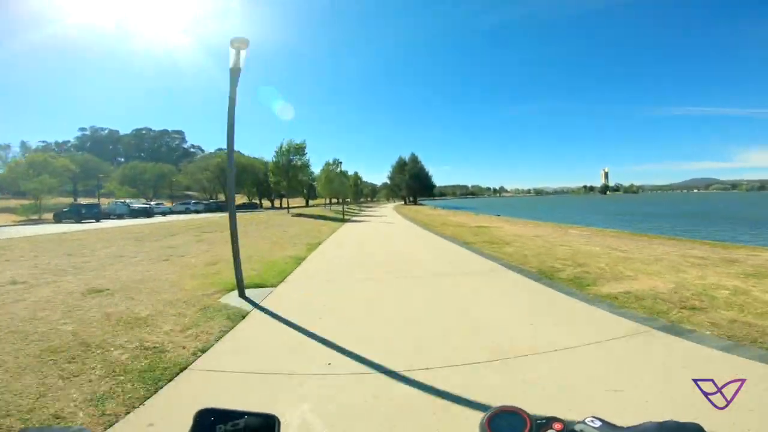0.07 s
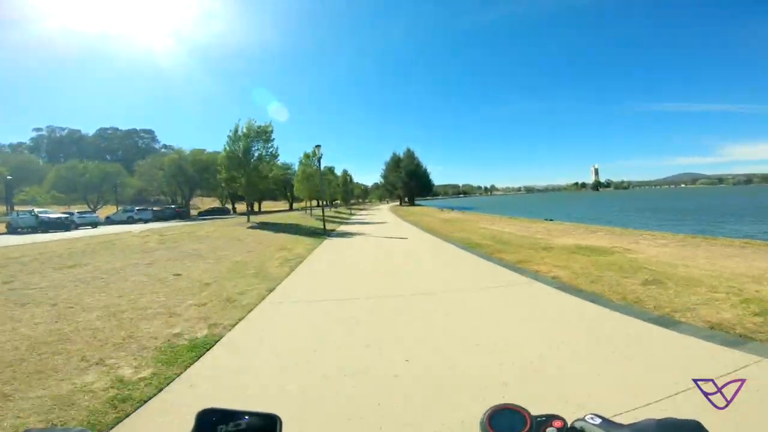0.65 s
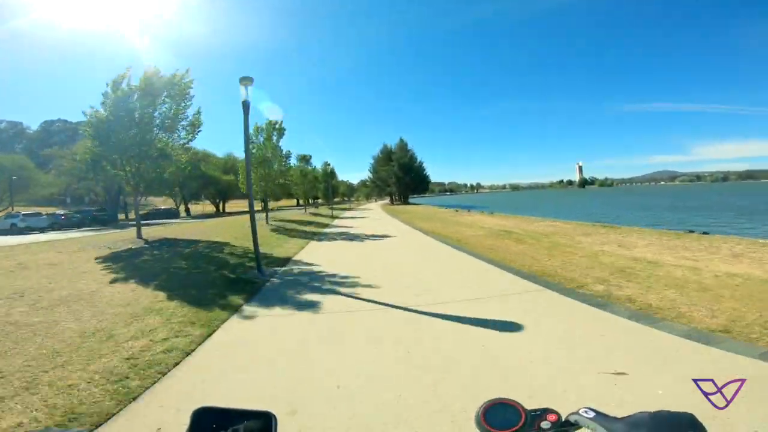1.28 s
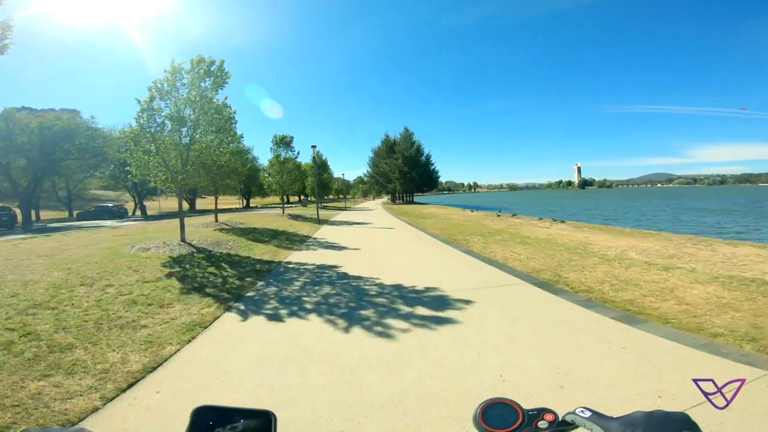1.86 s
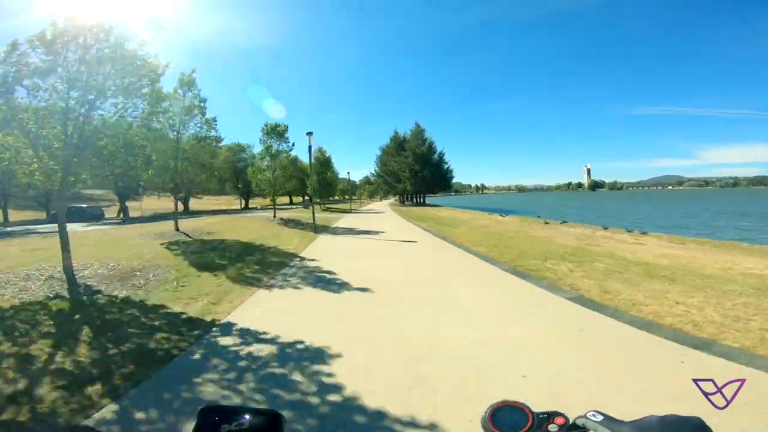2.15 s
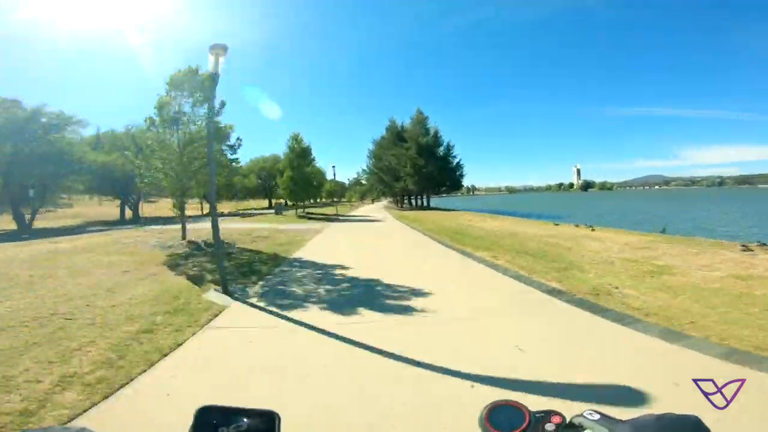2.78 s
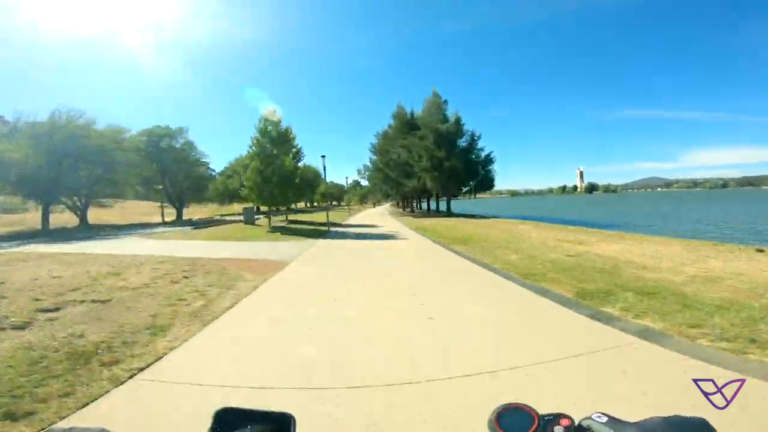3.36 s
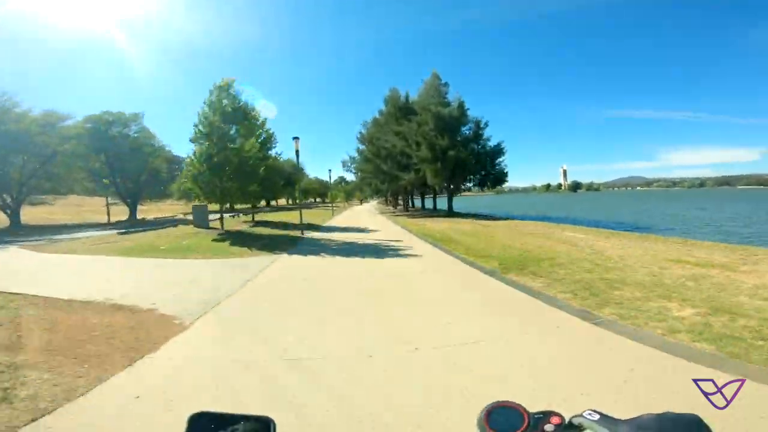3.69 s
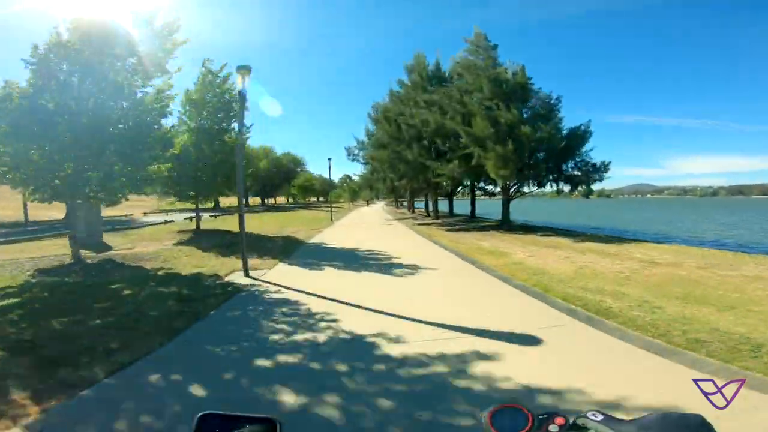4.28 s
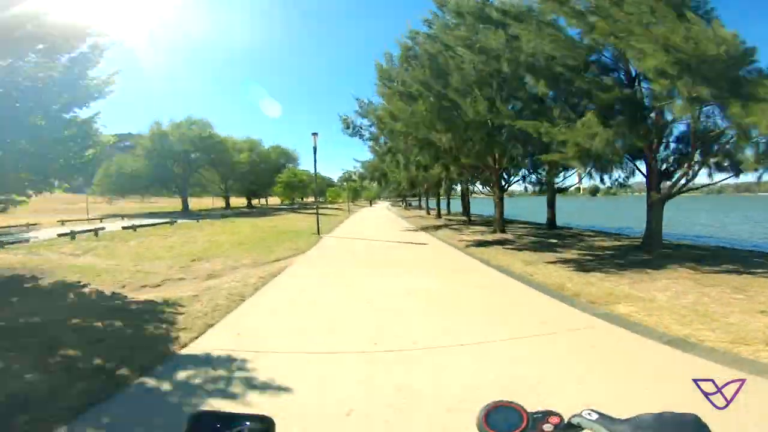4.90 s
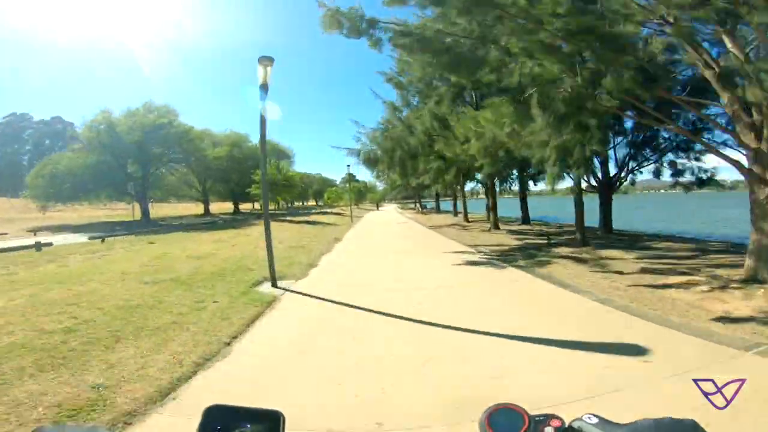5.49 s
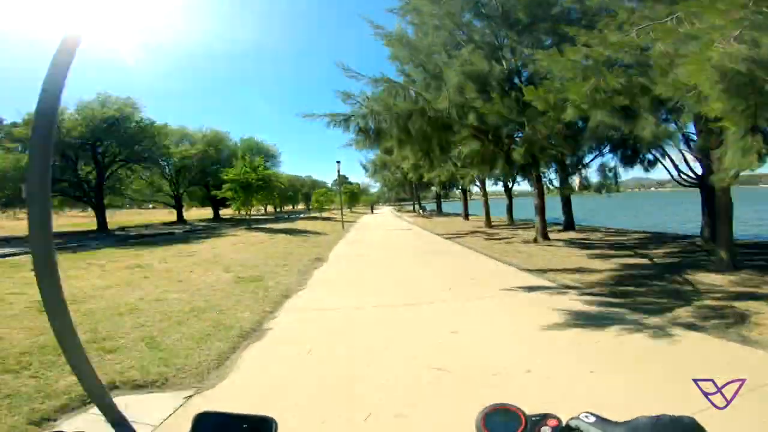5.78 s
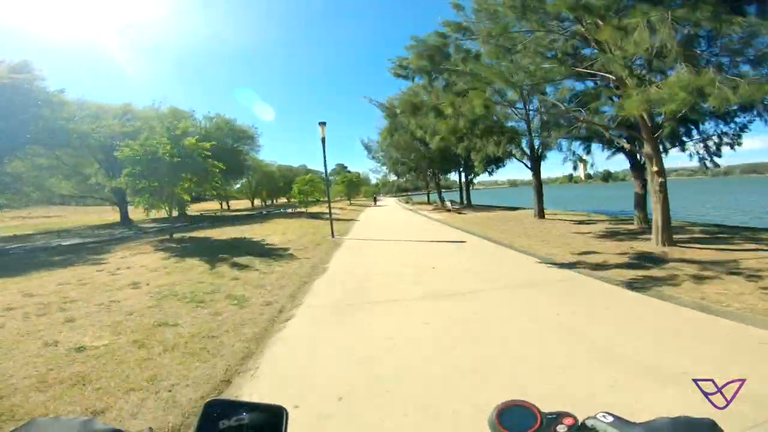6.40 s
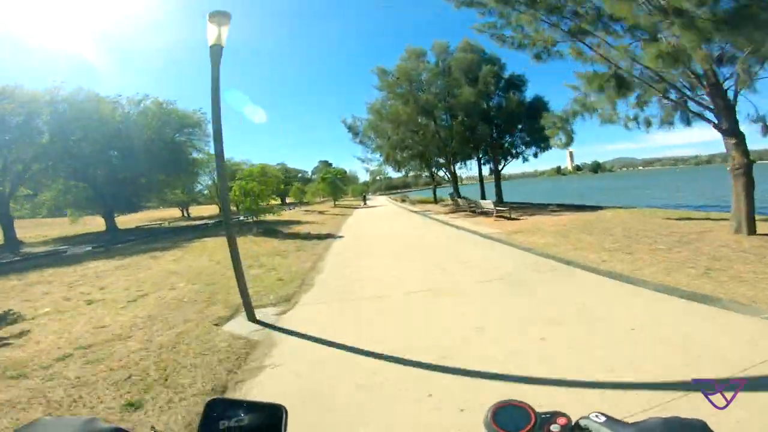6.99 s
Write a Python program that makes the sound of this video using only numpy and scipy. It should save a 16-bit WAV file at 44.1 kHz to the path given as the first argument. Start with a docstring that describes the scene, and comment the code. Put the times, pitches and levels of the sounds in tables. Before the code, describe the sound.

Wind gusts on the microphone over the throbbing whine of an electric scooter, its tyres roaring and thumping along concrete.

```python
"""An electric scooter cruises along a concrete lakeside path, heard from a small camera riding on it.
From the start two close motor notes throb, the tyres roar and hiss, and wind buffets both microphones.
Within half a second grit flies, faint crackles come and the wheels thump over joints between slabs.
Near 3 s a brief tone first swells just above the motor. After 5 s the wind drops, the bumps come thick
and fast and loose deck fittings knock. The wind picks up again for the last second and pops twice."""
import sys
import numpy as np
from scipy import signal
from scipy.fft import rfft, irfft, next_fast_len
from scipy.io import wavfile

SR = 44100
rng = np.random.default_rng(int(sys.argv[2]) if len(sys.argv) > 2 else 0)


def unload_wav(signal):
    """Save mono or channel-first audio to the path in sys.argv[1] as 16-bit WAV at rate SR, clipped to [-1, 1]."""
    wavfile.write(
        sys.argv[1],
        SR,
        np.round(np.clip(np.atleast_2d(signal).T, -1, 1) * 32767).astype(np.int16),
    )


N = 310905
TIME = np.arange(N) / SR
FREQ = np.fft.rfftfreq(N, 1 / SR) + 1e-3
LEAD_S = .004  # silence before each strike

# Levels in the tables are starting points: the functions add their own gains.
# midpoint of the two motor notes as the speed drifts: time_s, pitch_hz
MOTOR_PITCH = [(0, 410.5), (.7, 412), (1.3, 413.5), (2.6, 414), (3.9, 416), (4.4, 414.5), (5.05, 412.5),
               (5.7, 414.5), (7.05, 414)]
# gap between the two motor notes: time_s, beat_hz
MOTOR_BEAT = [(0, 4.24), (.55, 4.25), (1, 5.31), (2.7, 5.19), (3.6, 4.42), (4.5, 3.25), (5.65, 4.64),
              (6.15, 3.98), (6.55, 3.1), (7.05, 5.26)]
# strength of the motor's whine: time_s, level_db
MOTOR_LEVEL = [(0, -47.5), (.35, -54), (.74, -48.5), (1.05, -52.5), (1.48, -45.5), (1.7, -51.5),
               (2.1, -46.5), (2.45, -48.5), (2.7, -49.5), (3.05, -50.5), (3.7, -47), (4.2, -46),
               (4.7, -48.5), (5, -46), (5.5, -45.5), (5.75, -49), (6, -44.5), (7.05, -52)]

# tyres on the changing surface: time_s, roar_db, hiss_db
TYRE_LEVELS = [(0, -58, -81.5), (.33, -61, -81.5), (.38, -62, -90.5), (1.02, -61, -88.5),
               (1.12, -59, -84.5), (1.5, -60, -82.5), (1.6, -61.5, -89), (3, -61, -89.5),
               (4.6, -58.5, -81.5), (5.75, -57, -77.5), (6.4, -58, -79.5), (7.05, -60, -82)]
# tone of the tyre roar: frequency_hz, gain_db
ROAR_COLOUR = [(30, -13.5), (100, 1), (300, 4.5), (400, 8), (490, 13.5), (570, 5.5), (660, 0), (950, -1.5),
               (1300, 3), (1750, -3.5), (2500, -1.5), (3000, -10), (3600, -19.5), (4500, -33.5),
               (7000, -59.5)]
# tone of the tyre hiss: frequency_hz, gain_db
HISS_COLOUR = [(2500, -5.5), (3800, -2), (5000, 1.5), (5700, -1.5), (6250, -1), (6650, 1), (7050, -4),
               (7900, -9), (8800, -18), (10500, -30.5), (15000, -38.5)]
# where the wheels and deck ring: frequency_hz, width_hz, lift_db
DECK_RESONANCES = [(310, 38, 6.5), (434, 32, 5.5), (800, 110, 10), (1451, 54, 7.5), (1870, 350, 7)]
# road sound at the left microphone compared with the right: frequency_hz, gain_db
LEFT_SHADE = [(100, 3), (420, -1.5), (560, -5.5), (790, -21), (1050, -5.5), (1450, -13.5), (1750, -9),
              (1980, -9.5), (2200, -2), (3300, -9), (5200, -2.5), (7000, -8)]

# steady head wind: time_s, left_db, right_db
HEAD_WIND = [(0, -49, -42), (.7, -41, -42), (1.05, -41, -41.5), (2.2, -35, -39), (2.85, -39, -44.5),
             (3.12, -46, -41.5), (3.7, -41.5, -41.5), (4.05, -46.5, -42.5), (4.5, -39, -45),
             (4.65, -51.5, -42.5), (5.05, -43, -43.5), (5.15, -55, -52.5), (5.8, -60, -54),
             (6.15, -51.5, -46), (7.05, -42, -44.5)]
# gusts on top of it: start_s, length_s, left_db, right_db
WIND_GUSTS = [(0.126, 0.045, -34.5, -36), (0.213, 0.38, -37, -45.5), (0.219, 0.021, -40, -40),
              (0.801, 0.065, -36.5, -47.5), (1.264, 0.33, -38.5, -47.5), (1.589, .36, -37, -45),
              (1.72, 0.21, -39.5, -43.5), (2.094, 0.049, -38, -37), (2.462, .36, -38.5, -37.5),
              (2.902, 0.024, -37.5, -39.5), (3.196, 0.36, -36.5, -44.5), (3.654, 0.069, -38, -46),
              (3.854, 0.066, -41, -41.5), (4.264, 0.1, -36.5, -40.5), (4.86, 0.059, -47, -51.5),
              (5.608, 0.043, -45.5, -40.5), (6.238, 0.033, -36.5, -45), (6.389, 0.088, -38, -43),
              (6.692, 0.41, -39.5, -46.5)]
# tone of slow swirls of air: frequency_hz, gain_db
BUFFET_COLOUR = [(20, -34), (40, -29.5), (60, -16), (110, -2.5), (240, 1.5), (400, -1.5), (600, -11.5),
                 (1000, -23), (2000, -45.5), (5000, -81.5)]
# tone of the fast swirls in strong gusts: frequency_hz, gain_db
RUSH_COLOUR = [(100, -21.5), (300, -0.5), (500, 9), (800, -0.5), (1100, -6), (1500, -16.5), (2400, -29),
               (4000, -53), (9000, -74)]
# the rush grows steeply in strong wind: buffet_db, rush_db
RUSH_BY_WIND = [(-48.5, -72), (-42.5, -65), (-38, -49), (-31, -33)]

# the loudest stone chips: start_s, level_db, centre_hz
GRIT_HITS = [(0.2, -68, 5500), (1.399, -75, 5500), (1.615, -76, 5500), (1.688, -75, 5500),
             (2.118, -77, 5300), (2.154, -71, 5500), (2.908, -82, 5500), (3.134, -73, 5400),
             (3.171, -77, 6000), (4.685, -70, 5500), (4.764, -69, 6000), (5.742, -64, 5600),
             (5.782, -63, 6000), (5.812, -64, 6700), (6.163, -76, 7200), (6.304, -67, 6900),
             (6.463, -73, 7300)]
# brief faint crackles of rapid clicks: middle_s, half_length_s, level_db, centre_hz
TREBLE_CRACKLES = [(0.312, 0.055, -90, 10500), (.73, .03, -99, 9000), (1.11, 0.045, -102, 9000),
                   (1.24, .04, -100, 8500), (1.463, 0.025, -86, 9500), (2.42, .015, -99, 9500),
                   (2.67, 0.016, -99, 9000), (2.825, .015, -101, 9000), (3.137, .03, -83, 5200),
                   (3.19, .04, -98, 8600), (4.383, .015, -97, 10000), (4.92, .03, -98, 9000),
                   (5.716, 0.05, -72, 2980), (5.76, 0.043, -77, 5600), (5.899, 0.051, -83, 6500),
                   (6.285, 0.039, -57.5, 2350), (6.302, .03, -82, 7000), (6.439, 0.012, -87, 10100),
                   (6.487, 0.041, -92, 9000), (6.88, 0.015, -91, 10300)]
# tiny sharp ticks: start_s, level_db
SHARP_TICKS = [(.278, -70), (.294, -67), (.321, -73), (.337, -67), (.369, -72), (1.456, -73), (1.509, -63),
               (1.515, -69), (2.665, -82), (6.437, -71), (6.443, -72), (6.879, -77)]
# thumps and clacks from the path, plus wind pops at 6.453 and 6.724 s: start_s, thump_db, clack_db
THUMPS_AND_CLACKS = [(.305, -32, -27), (0.338, -25.5, -27), (0.46, -35, -33), (1.402, -29, -31),
                     (2.274, -38.5, -24), (2.327, -35, -24.5), (2.83, -27.5, -34), (4.267, -35, -27),
                     (4.786, -33.5, -21), (5.236, -30, -36), (5.261, -26.5, -32), (5.439, -33.5, -27.5),
                     (5.836, -31.5, -23), (6.032, -29.5, -32), (6.453, -42, -42), (6.463, -29.5, -18.5),
                     (6.647, -28.5, -23), (6.724, -32.5, -31), (6.832, -32.5, -20)]
# ringing of the stem and camera mount (fade is the time to fall 60 dB): pitch_hz, level_db, fade_s
MOUNT_RINGS = [(433, -12, 0.027), (590, -3, 0.03), (754, -7, 0.03), (950, -10, 0.017), (1280, -6, 0.0086),
               (1497, -8.5, 0.016)]
# brief wavering tones just above the motor whine: middle_s, half_length_s, level_db, pitch_hz
TONE_SWELLS = [(3.07, 0.1, -54, 443), (4.62, .07, -54, 441), (5.28, 0.088, -58, 439),
               (5.5, 0.078, -50, 452.6), (5.684, 0.065, -48.5, 468.6), (5.93, .07, -56, 438),
               (6.274, 0.092, -53.5, 471), (6.63, .07, -49, 470)]
# knocks of loose deck fittings: start_s, level_db
DECK_KNOCKS = [(5.216, -49), (5.639, -45.5), (5.686, -45), (5.717, -50), (5.846, -47), (6.607, -52)]


def undb(db):
    """Turn decibels into a number to multiply by."""
    return 10 ** (np.asarray(db) / 20)


def unit(x):
    """Scale a signal to an average strength (rms) of 1."""
    return x / np.sqrt(np.mean(x ** 2))


def curves(table):
    """Join the points of each column with straight lines in time."""
    times, *columns = np.transpose(table)
    return [np.interp(TIME, times, column) for column in columns]


def colour(points):
    """Turn a tone table into a gain for every frequency."""
    hz, db = np.transpose(points)
    return undb(np.interp(np.log(FREQ), np.log(hz), db))


def shape(x, gain):
    """Turn each frequency of a sound up or down by its gain."""
    size = next_fast_len(N, real=True)
    gain = np.interp(np.fft.rfftfreq(size, 1 / SR), FREQ, gain)
    return irfft(rfft(x, size) * gain, size)[..., :N]


def noise():
    """White noise: an even hiss."""
    return rng.standard_normal(N)


def wander(rate_hz):
    """A smooth random wobble of size 1; a higher rate wobbles faster."""
    return unit(shape(noise(), np.exp(-(FREQ / rate_hz) ** 2)))


def add(out, start_s, sound):
    """Mix a short sound in at the given time."""
    start = max(int(start_s * SR), 0)
    out[:, start:start + sound.shape[1]] += sound[:, :N - start]


def strike(decay_s):
    """The loudness outline of a blow: a sudden start, then a quick fade."""
    age = TIME[:4096] - LEAD_S
    return (age > 0) * np.exp(-np.abs(age) / decay_s)


def burst(outline, hz, width):
    """A band of noise around hz that follows a loudness outline, separate for each microphone."""
    freq = np.fft.rfftfreq(len(outline), 1 / SR) + 1
    band = np.exp(-.5 * (np.log(freq / hz) / width) ** 2)
    mics = irfft(rfft(rng.standard_normal((2, len(outline))) * outline) * band)
    return np.array([unit(mic) for mic in mics]) * np.sqrt(np.mean(outline ** 2))


def from_road(direct, scattered_left=0, scattered_right=0, lag_s=.000295):
    """Sound from below reaches the left microphone later and mostly weaker."""
    late_and_shaded = colour(LEFT_SHADE) * np.exp(-2j * np.pi * FREQ * lag_s)
    return np.array([shape(direct + scattered_left, late_and_shaded), direct + scattered_right])


def widen(mics):
    """The camera widens its stereo by taking some of each side away from the other."""
    leak = colour([(60, -27.5), (200, -19.0), (350, -15.5), (550, -7.5), (1000, -5.5), (2500, -18.0)])
    return mics - shape(mics[::-1], leak)


def motor(gain_db=-6, lower_db=-0.7, waver_hz=0.34, left_db=-1, right_db=2, lag_rad=0.24):
    """Two close magnetic notes slip in and out of step, so they throb; faint tones sit above them."""
    slip = -.56 + 2 * np.pi * np.cumsum(curves(MOTOR_BEAT)[0]) / SR
    phase = 2 * np.pi * np.cumsum(curves(MOTOR_PITCH)[0] + waver_hz * wander(9.5)) / SR
    notes = np.exp(1j * (phase + slip / 2)) + undb(lower_db) * np.exp(1j * (phase - slip / 2))
    left = undb(left_db) * (notes * np.exp(-1j * lag_rad)).real
    right = undb(right_db) * notes.real
    overtones = undb(-13) * np.cos(1.922 * phase) + undb(-17) * np.cos(2 * phase)
    just_above = undb(-11) * np.cos(1.055 * phase + 0.34 * wander(13))
    whine = np.array([left, right]) + from_road(overtones + just_above)
    return np.sqrt(2) * whine * undb(curves(MOTOR_LEVEL)[0] + gain_db)


def tyres(roar_db=8, hiss_db=1, hiss_scatter=2.3, bounce_db=1.16, grain_db=1.63):
    """Tread on rough concrete: a fluttering roar rings through wheels and deck, with fine hiss above."""
    roar_level, hiss_level = curves(TYRE_LEVELS)
    # the wheels bounce about 25 times a second
    bounce = unit(shape(noise(), np.exp(-((FREQ - 25) / 14) ** 2)))
    flutter = undb(bounce_db * bounce + grain_db * wander(450))
    ring_db = sum(db / (1 + (2 * (FREQ - hz) / width) ** 2) for hz, width, db in DECK_RESONANCES)
    # the low roar comes from the whole frame, so the microphones share less of it
    scatter = 0.34 + 0.93 / (1 + (FREQ / 1400) ** 6)
    body = colour(ROAR_COLOUR) * undb(ring_db) / np.sqrt(1 + scatter ** 2)
    roar = from_road(*(shape(noise(), body * g) for g in (1, scatter, scatter)))
    hiss = from_road(*(shape(noise(), colour(HISS_COLOUR) * g) for g in (1, hiss_scatter, hiss_scatter)))
    roar = flutter * unit(roar) * undb(roar_level + roar_db)
    hiss = np.sqrt(flutter) * unit(hiss) * undb(hiss_level + hiss_db)
    return roar + hiss


def wind_level(rise_s=0.024, fall_s=0.041):
    """Wind strength in dB at each microphone: head wind plus gusts that rise, hold and die away."""
    power = undb(curves(HEAD_WIND)) ** 2
    for start, length, left_db, right_db in WIND_GUSTS:
        rise = np.clip((TIME - start) / rise_s, 0, 1)
        fall = np.exp(-np.maximum(TIME - start - length, 0) / fall_s)
        power += (undb([[left_db], [right_db]]) * rise * fall) ** 2
    return 10 * np.log10(power)


def wind(buffet_db=-1, rush_db=-1, swirl_db=1.87, flicker_db=1.5, right_db=-1, deep_hz=150):
    """Slow swirls of air buffet each microphone; strong gusts add a brighter rush."""
    level = wind_level()
    swirls = undb(swirl_db * np.array([wander(75), wander(59)]))
    buffet = unit(shape(np.array([noise(), noise()]) * swirls, colour(BUFFET_COLOUR)))
    # faster air makes smaller swirls, so the deepest rumble grows less than the rest
    deep = shape(buffet, 1 / (1 + (FREQ / deep_hz) ** 6))
    deep_level = level.mean() + 0.48 * (level - level.mean())
    buffet = undb(buffet_db) * ((buffet - deep) * undb(level) + deep * undb(deep_level))
    # the rush pushes one microphone as it pulls the other; each also gets some noise of its own
    flow = noise() * np.array([[1], [-1]]) + 0.54 * np.array([noise(), noise()])
    flow = flow * swirls[0] * undb(flicker_db * wander(300))
    rush = unit(shape(flow, colour(RUSH_COLOUR))) * undb([[0], [right_db]])
    rush_level = np.interp(level[0], *np.transpose(RUSH_BY_WIND))
    return widen(buffet) + rush * undb(rush_level + rush_db)


def grit(decay_s=0.006, left_db=-5, fine_count=24, fine_db=-91.5, fine_hz=6500):
    """The tyres flick stone chips, each a soft tick; finer ones fly at random times."""
    out = np.zeros((2, N))
    fine_times = rng.uniform(0, TIME[-1], fine_count)
    fine = [(start, fine_db + 2 * rng.standard_normal(), fine_hz) for start in fine_times]
    for start, db, hz in GRIT_HITS + fine:
        add(out, start - LEAD_S, undb(db) * burst(strike(decay_s), hz, width=.16))
    return out * undb([[left_db], [0]])


def crackles(clicks_per_s=190, jitter=0.091, scatter_db=3, click_s=.0005, hiss=0.2, left_db=-2):
    """The treble crackles faintly for a moment: rapid, uneven clicks with a little hiss between."""
    out = np.zeros((2, N))
    click_count = np.cumsum(clicks_per_s * np.exp(jitter * wander(60))) / SR
    strength = undb(scatter_db * noise())[click_count.astype(int)]
    clicks = strength * np.exp(-(click_count % 1) / (clicks_per_s * click_s))
    crackle = unit(clicks + hiss)
    offset = TIME[:8192] - TIME[4096]
    for middle, half_length, db, hz in TREBLE_CRACKLES:
        outline = np.exp(-(offset / half_length) ** 2) * np.interp(middle + offset, TIME, crackle)
        add(out, middle + offset[0], undb(db) * burst(outline, hz, width=0.23))
    return out * undb([[left_db], [0]])


def ticks(decay_s=.00025, hz=9300, gain_db=1.5, left_db=-2):
    """Tiny sharp ticks stand out high above the rest."""
    out = np.zeros((2, N))
    for start, db in SHARP_TICKS:
        add(out, start - LEAD_S, undb(db + gain_db) * burst(strike(decay_s), hz, width=.36))
    return out * undb([[left_db], [0]])


def thumps_and_clacks(thump_s=0.0082, thump_hz=230, thump_gain_db=-1, clack_gain_db=-4, lag_s=0.000097):
    """Bumps in the path give a dull thump and a clack that rocks the mount; two wind pops sound alike."""
    thumps, clacks = np.zeros((2, N)), np.zeros((1, N))
    age = TIME[:4096]
    ring = sum((-1) ** k * undb(db - 60 * age / fade_s) * np.sin(2 * np.pi * hz * age)
               for k, (hz, db, fade_s) in enumerate(MOUNT_RINGS))
    for start, thump_db, clack_db in THUMPS_AND_CLACKS:
        thump = burst(strike(thump_s), thump_hz, width=0.75)
        add(thumps, start - LEAD_S, undb(thump_db + thump_gain_db) * thump)
        add(clacks, start, undb(clack_db + clack_gain_db) * ring[None])
    thumps *= undb([[-15], [0]])  # weaker on the left
    # soft rubber passes on no treble
    right = signal.sosfilt(signal.butter(4, 1900, fs=SR, output="sos"), clacks[0])
    # sideways rocking moves the two microphones opposite ways
    left = -undb(-3.5) * shape(right, np.exp(-2j * np.pi * FREQ * lag_s))
    return widen(thumps) + np.array([left, right])


def tone_swells(waver_hz=6):
    """Now and then a wavering tone swells and fades just above the motor whine."""
    waver = waver_hz * wander(31)
    tones = np.zeros(N)
    for middle, half_length, db, hz in TONE_SWELLS:
        swell = undb(db) * np.exp(-((TIME - middle) / half_length) ** 2)
        tones += swell * np.sin(2 * np.pi * np.cumsum(hz + waver) / SR)
    return from_road(np.sqrt(2) * tones)


def knocks(decay_s=0.0031, hz=2000, gain_db=1, left_db=-4):
    """Loose deck fittings knock: dry, bright and over in a few milliseconds."""
    out = np.zeros((2, N))
    for start, db in DECK_KNOCKS:
        add(out, start - LEAD_S, undb(db + gain_db) * burst(strike(decay_s), hz, width=0.3))
    return out * undb([[left_db], [0]])


def scene():
    """Wind on the microphones over the motor, the tyres and the bumps of the path."""
    return (wind() + thumps_and_clacks() + motor() + tyres() + tone_swells()
            + grit() + knocks() + crackles() + ticks())


def record(dry):
    """The camera cuts the very highest sounds, above 14800 Hz."""
    return signal.sosfilt(signal.ellip(8, .2, 70, 14800, fs=SR, output="sos"), dry)


dry = scene()
out = record(dry)
unload_wav(out)
```